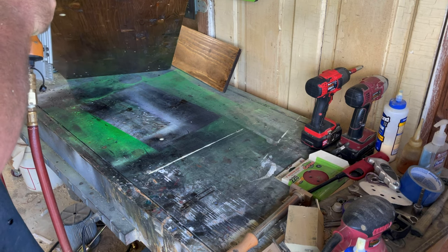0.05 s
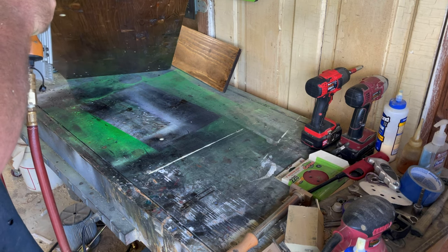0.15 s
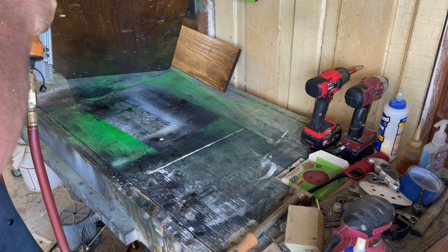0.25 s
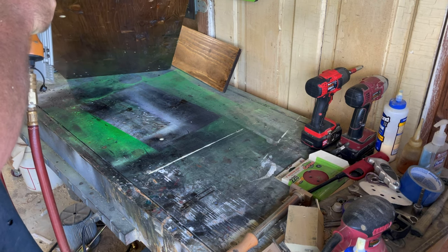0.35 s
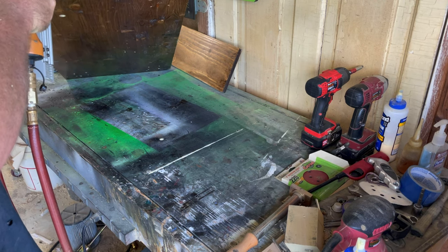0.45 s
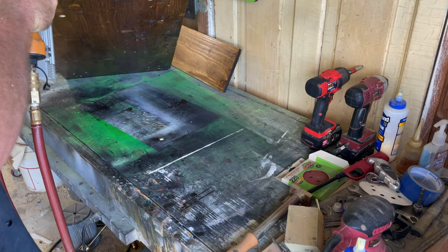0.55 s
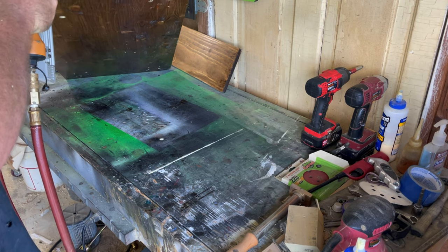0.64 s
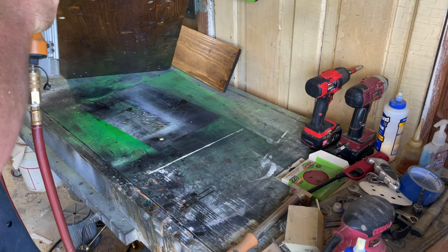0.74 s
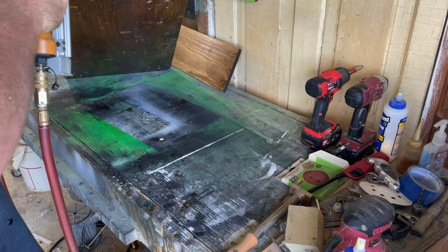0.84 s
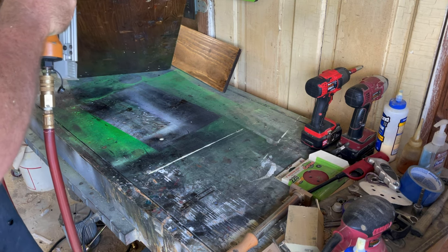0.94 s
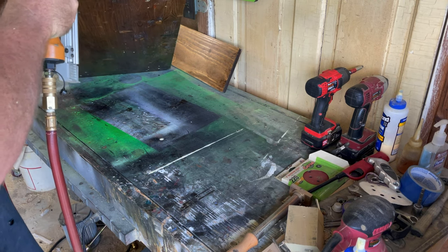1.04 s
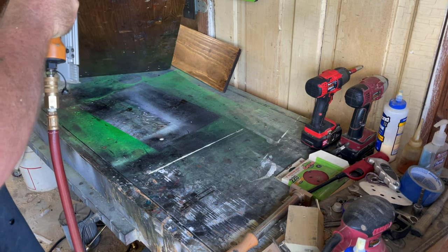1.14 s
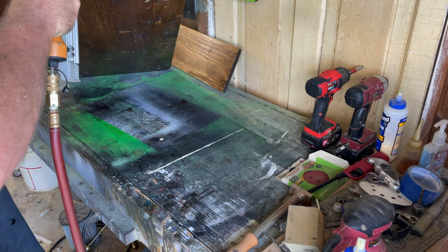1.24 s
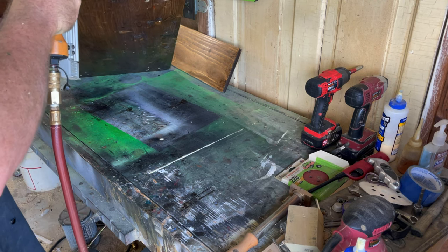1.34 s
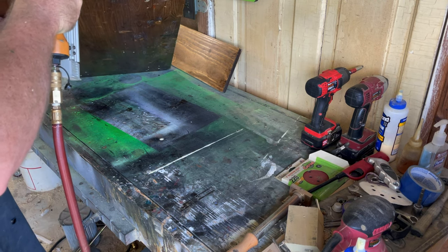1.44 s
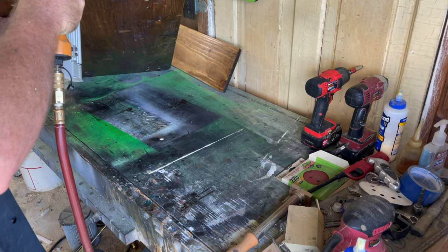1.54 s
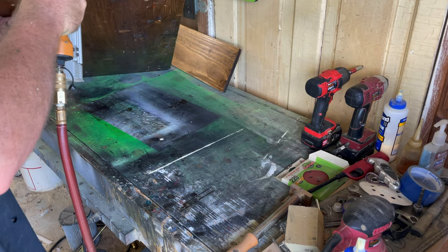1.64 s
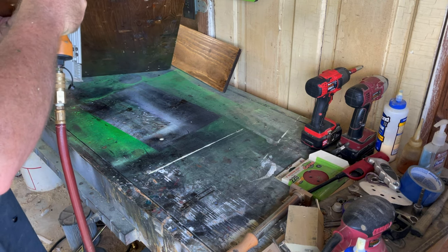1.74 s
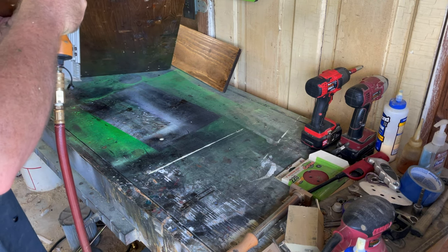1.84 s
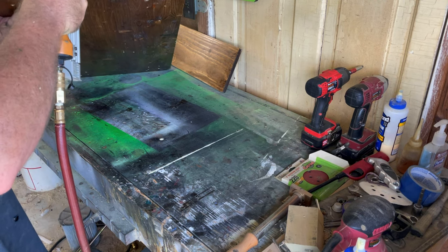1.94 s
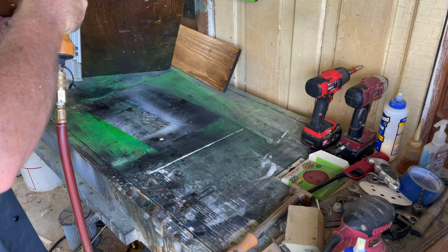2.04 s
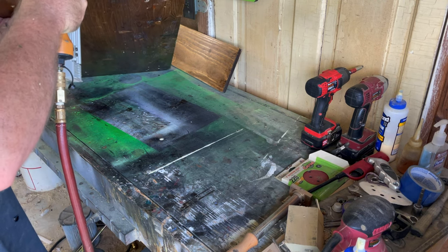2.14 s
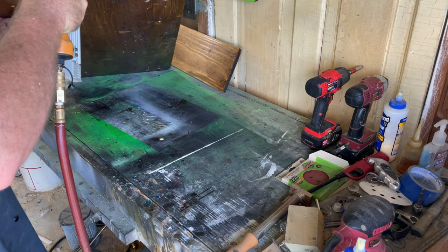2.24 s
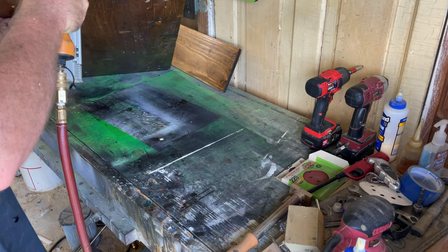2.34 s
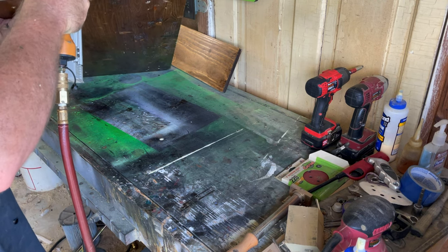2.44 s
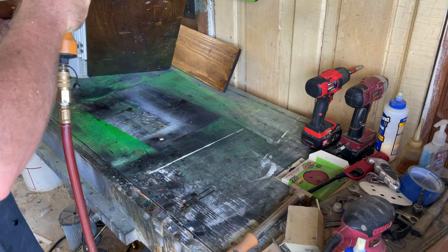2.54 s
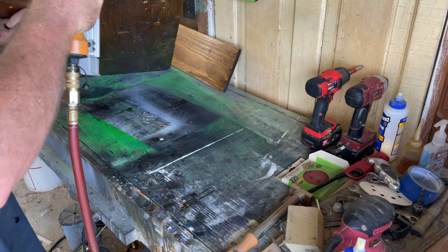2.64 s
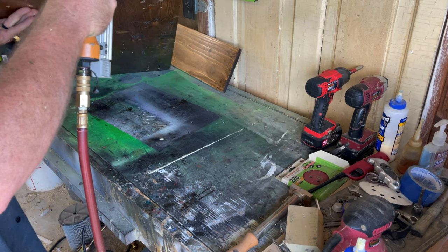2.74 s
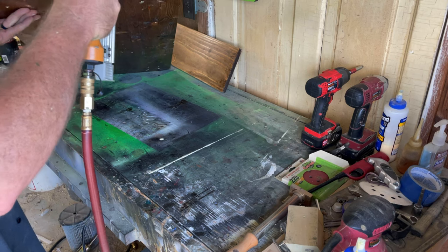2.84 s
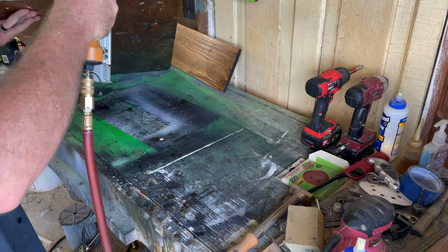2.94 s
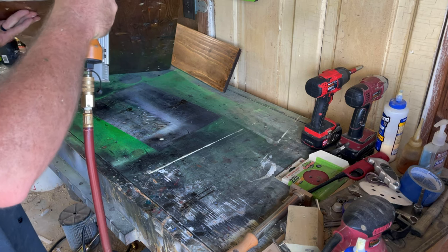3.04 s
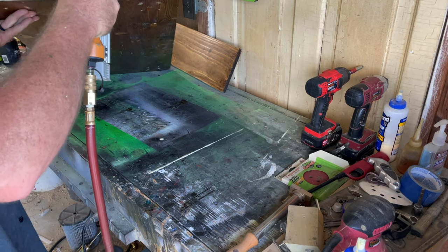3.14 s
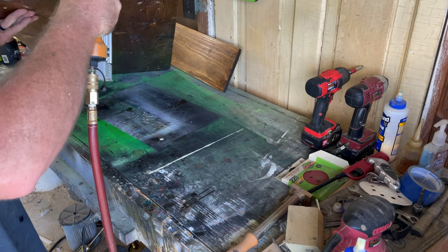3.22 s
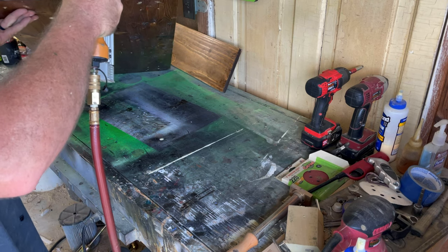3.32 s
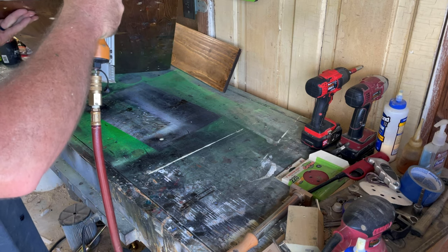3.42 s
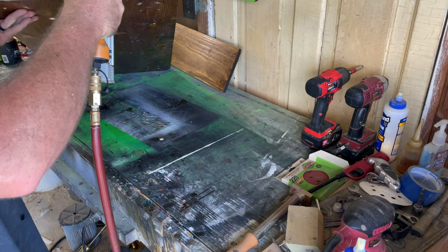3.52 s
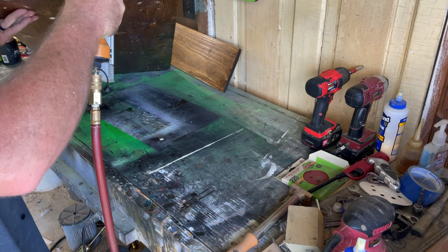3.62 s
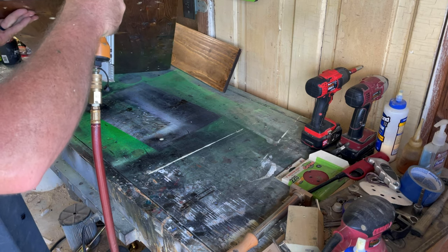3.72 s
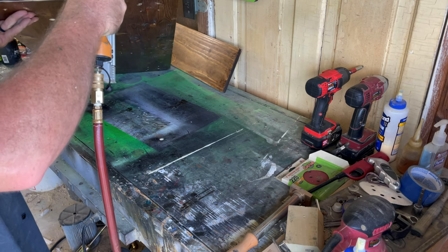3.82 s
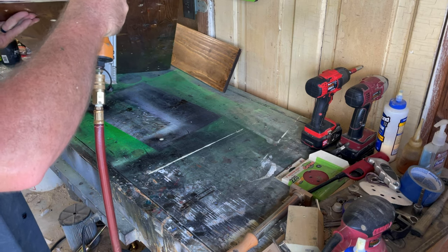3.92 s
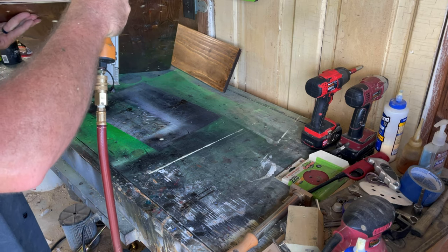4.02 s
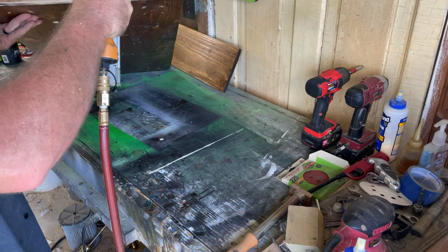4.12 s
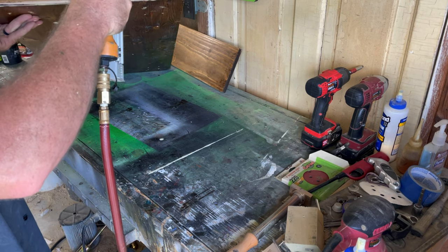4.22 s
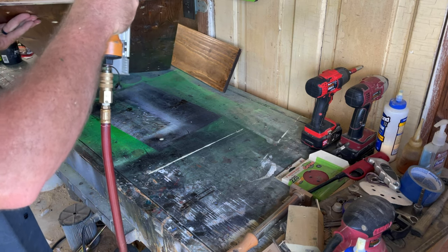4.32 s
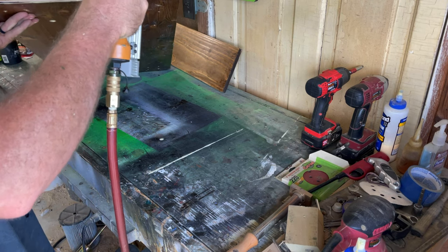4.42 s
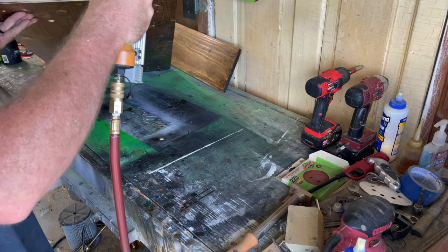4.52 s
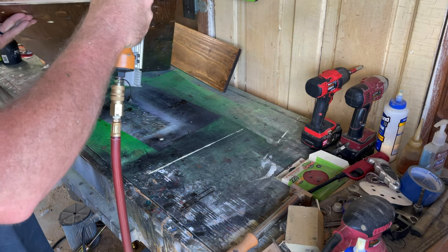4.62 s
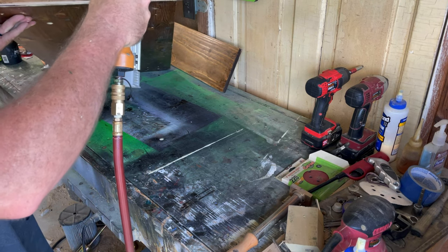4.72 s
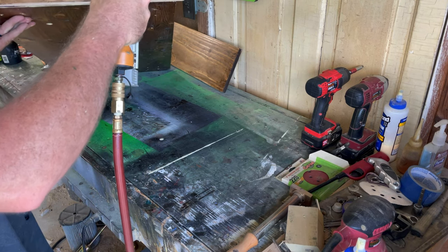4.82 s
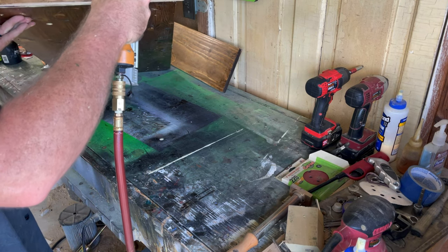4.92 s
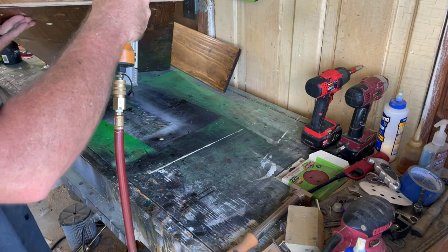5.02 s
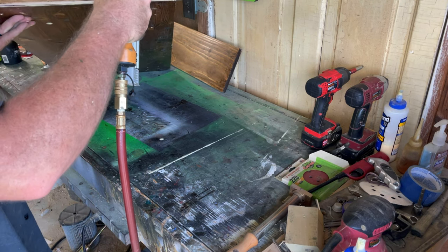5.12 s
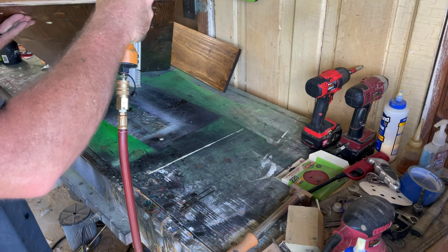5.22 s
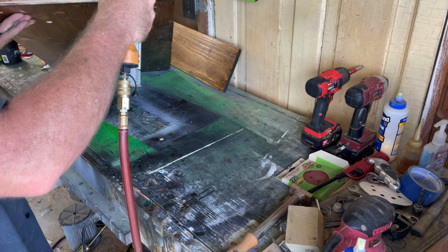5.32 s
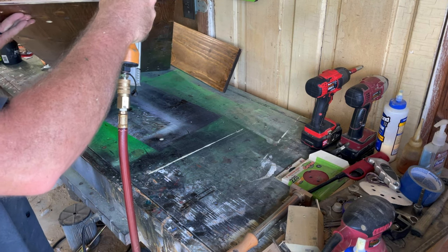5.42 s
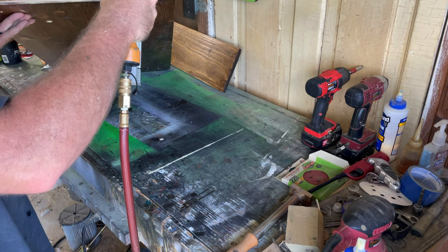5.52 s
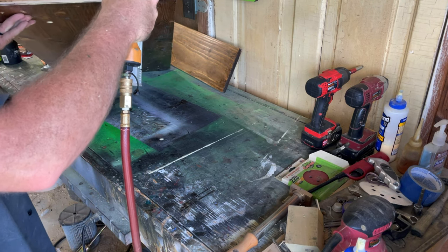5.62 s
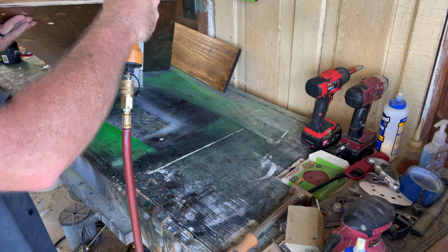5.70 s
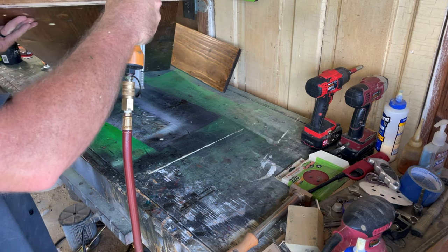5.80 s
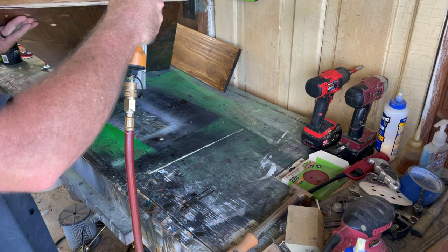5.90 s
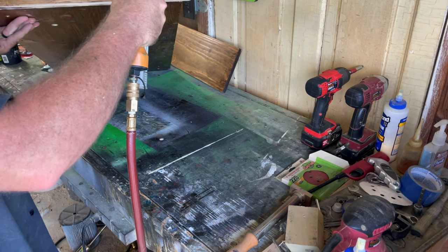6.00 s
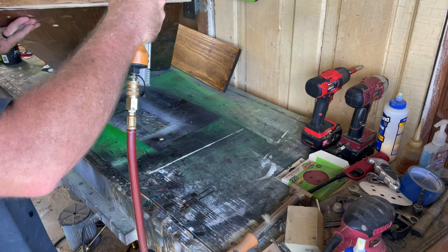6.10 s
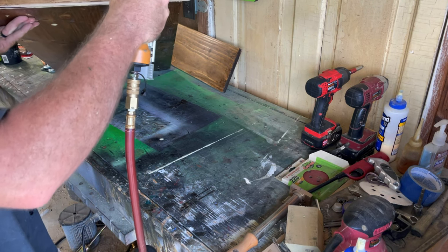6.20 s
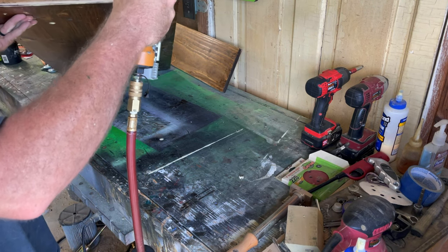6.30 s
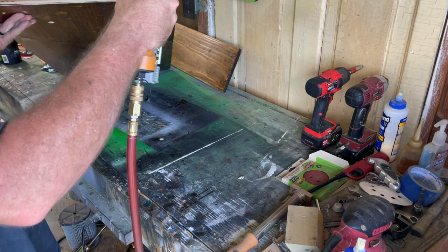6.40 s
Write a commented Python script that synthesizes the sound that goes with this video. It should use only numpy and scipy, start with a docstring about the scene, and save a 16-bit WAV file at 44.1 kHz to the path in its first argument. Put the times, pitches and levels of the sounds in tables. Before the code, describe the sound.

A quiet garage hush with a faint, wavering distant hum, slightly louder until the first shot. At 0.3 s the nailer's steel nose clacks on wood, with a faint bump at 0.4. At about 0.5 s a tiny trigger tick and short air hiss lead into a piercing crack with metallic, woody clatter; at 0.63 a bright blast of exhaust follows, with a low sinking flutter and the piston knocking home. The air seeps away within a fraction of a second. Light ticks come at 1.6, then a clack at 2.1, before the second shot at 2.35 and its exhaust at 2.45. Faint taps at 3.4 and 3.8 precede the third shot at 4.05, venting at 4.15. Small ticks at 5.3 and 5.65 and a slight slide at 5.85 lead to the last shot at 5.95, exhaust at 6.05, and a soft tap at 6.26. Close microphone, short reverberation.

```python
"""A pneumatic nailer fires four brads into a board in a small garage, over a quiet hush and a far-off hum.
Each shot is a trigger tick, a hiss of filtered noise, a push-pull pulse for the driver's blow and a noise clatter,
then a noise blast of exhaust with a sinking low swing, and the piston knocking home as ringing modes.
Between shots the steel nose ticks and clacks on the wood; the first bang drops an early boost for good."""
import sys
import numpy as np
from scipy import signal
from scipy.fft import rfft, irfft, next_fast_len
from scipy.io import wavfile
from scipy.ndimage import uniform_filter1d, map_coordinates

SR = 44100
rng = np.random.default_rng(int(sys.argv[2]) if len(sys.argv) > 2 else 0)


def wav_record(signal):
    """Record a signal, one row per channel, as 16-bit PCM in the file named by sys.argv[1]."""
    frames = np.transpose(np.atleast_2d(signal))
    bounded = np.clip(frames, -1, 1)
    # unit amplitude maps onto the largest positive 16-bit level
    quanta = np.round(bounded * 32767).astype(np.int16)
    wavfile.write(sys.argv[1], SR, quanta)


N = 284811
SPAN = SR // 2  # samples laid down for one event
LEAD_IN_S = .02  # an event's time zero lies this far into its span

# Event levels are those ahead of the boost and rounding in record().
# shots: (valve opens [s], trigger tick [dB], hiss [dB], stroke [dB], snap [dB], clatter [dB], bench rumble [dB])
SHOTS = [(.511, -61, -35.5, -27, -5, -10, -30.5), (2.338, -66, -37, -31, -6.5, -10.5, -36),
         (4.031, -68, -36, -27.5, -7, -11.5, -40), (5.927, -69, -37, -31, -4.5, -10.5, -37.5)]
# exhausts: (time [s], blast [dB], whistle [dB], swing [dB], swing starts at [Hz], swing lasts [s],
# buffet [dB], bench rumble [dB], piston rattles after [s], rattle [dB], piston home [dB])
EXHAUSTS = [(.633, -12, -15, -8, 170.7, .027, -15, -44, .014, -27.5, -26.5),
            (2.455, -9.5, -16, -18.5, 100, .045, -18, -46, .019, -25, -21.5),
            (4.146, -9, -21.5, -18, 149, .019, -26.5, -50.5, .0205, -21.5, -26.5),
            (6.042, -11.5, -11.5, -22, 231, .025, -18, -47, .02, -33.5, -26.5)]
# handling contacts: (time [s], tick [dB], knock [dB], thud [dB])
TOUCHES = [(.268, -65, -67.5, -73), (0.287, -67, -71.5, -75), (.301, -50.5, -44, -50.5),
           (.42, -80, -72, -60.5), (1.564, -66, -74.5, -90), (2.058, -71, -70.5, -80),
           (2.077, -70.5, -77.5, -82), (2.091, -59.5, -51, -56.5), (3.36, -69.5, -85, -75.5),
           (3.755, -74.5, -75, -83), (3.786, -59, -52.5, -56), (5.26, -72, -81, -80),
           (5.618, -72.5, -66, -83), (5.659, -55.5, -53, -54), (5.851, -71, -75.5, -71),
           (5.864, -68, -72.5, -70.5), (6.26, -63, -50, -71.5)]
# the far-off hum wavers: (time [s], low band [dB], upper band [dB])
HUM_LEVELS = [(0, -86, -74), (1, -81, -76.5), (2.4, -83, -80), (3.4, -73.5, -78.5), (4.3, -78.5, -80),
              (5, -76.5, -72), (5.7, -82.5, -78), (6.46, -75.5, -74.5)]

# envelopes: (wait [ms], rise [ms], hold [ms], change over the hold [dB], t60 [ms],
# slower tail against the quick fall [dB], tail t60 [ms])
VALVE_ENV = (-1.5, 4, 130, -13, 50, -40, 50)
SURGE_ENV = (5, 13, 2.5, -0.17, 90, -40, 100)
STROKE_ENV = (0.5, 19.5, 2, 0.2, 7.5, -60, 8.5)
CLATTER_ENV = (-3, 7, 3, -2, 41, -5, 75.5)
SHAKE_ENV = (0, 8, 2, 0.14, 120, -7.5, 600)
BLAST_ENV = (-4.5, 8.5, 1, -1.3, 35, -40, 35)
JET_ENV = (-1, 6, 34.5, -8, 70, -24.5, 150)
WHISTLE_ENV = (0, 2.5, 6.5, -0.78, 30, -12, 49.5)
DRAIN_ENV = (19.5, 25, 160, -17, 258, -40, 300)
GUST_ENV = (0, 8, 8, -0.2, 49.5, -40, 50)
LINGER_ENV = (20, 39.5, 149.5, -13.5, 500, -30, 700)
KNOCK_ENV = (0, 1, 2, -4, 22, -10, 45)
TICK_ENV = (0, 0.97, 5, -1, 50, -10, 100.5)
TAP_ENV = (0, 1, 7, -1.5, 60, -10.5, 90)
THUD_ENV = (8, 12.5, 2.5, 0.14, 120.5, -8, 600)
SLIDE_ENV = (1, 34.5, 19.5, -2.5, 28.5, -40, 30)

# noise colours, relative only: (frequency [Hz], density per Hz [dB])
# rushing air, seeping air, whistling exhaust port, low eddies of the jet
AIR = [(300, -42.5), (1000, -18.5), (3000, -7), (5000, -5), (7000, -3), (9000, 5), (12000, -4),
       (15500, -11.5)]
LEAK = [(500, -28.5), (1500, -10.5), (3000, -7.5), (4300, -6), (5100, 0), (6000, -5.5), (8500, -2.5),
        (12000, -3.5), (15500, -13.5)]
PORT = [(300, -25.5), (700, -7.5), (1200, -6), (1700, -4), (2500, -12.5), (4000, -15), (7000, -37.5)]
EDDIES = [(30, -10), (60, -2), (120, -4.5), (250, -7.5), (400, -10), (700, -33)]
# nailer body, cylinder cap, steel, wood, bench
BODY = [(60, -28), (200, -10.5), (400, 0.5), (850, -7), (1500, -7), (2200, -5.5), (3500, -9.5), (5000, -11),
        (8000, -12), (12000, -12.5), (15500, -23)]
CAP = [(300, -17), (700, -3), (1200, -1), (2000, -4), (3000, -11.5), (5000, -23.5), (9000, -44)]
STEEL = [(1000, -23.5), (2500, -7), (4000, 3.5), (6000, -3.5), (9000, -2.5), (12000, -8), (15500, -17)]
WOOD = [(200, -9.5), (500, -11), (1200, -4.5), (2100, 0.5), (3000, -8.5), (5000, -18.5), (9000, -36)]
BENCH = [(25, -20), (40, -1), (58, 3.5), (90, -6.5), (160, -15), (300, -26.5), (600, -59)]
# room hush, the two bands of hum, and flat noise for the reverberation
HUSH = [(25, -20), (65, -1.5), (112, -8.5), (160, -1.5), (270, -8), (600, -7.5), (1790, -8.5), (2600, -16),
        (4200, -25), (5200, -24.5), (6500, -29.5), (8640, -39.5), (11800, -32.5), (14500, -52)]
LOW_HUM = [(120, -40.5), (145, -2), (162, 1.5), (195, -40)]
UPPER_HUM = [(380, -39.5), (415, 0), (445, 2), (490, -41)]
FLAT = [(20, 0)]

# resonances of the nailer, its cylinder and its nose: (frequency [Hz], width [Hz], strength [dB])
NAILER_MODES = [(423, 360, -11), (816, 100, 1), (1320, 210, -2.5), (1520, 270, -0.5), (1980, 62, -4.5),
                (2150, 120, -1.5), (2720, 170, -6), (3570, 390, -3), (4800, 410, -7.5), (6400, 120, -12.5)]
CYLINDER_MODES = [(402, 70, -9), (794, 37, -1), (1085, 57, -1), (1500, 110, -5), (2120, 57, -8.5),
                  (2310, 69, -11), (2850, 140, -11.5)]
NOSE_MODES = [(1240, 190, -5.5), (1870, 70, -2.5), (2100, 17, -0.5), (2940, 90, -8), (3530, 90, -7.5),
              (4770, 120, -9), (5370, 110, -9.5)]

# near sound at the microphone pair, phase: (frequency [Hz], left leads right [rad])
LEFT_LEADS = [(200, 0), (700, .9), (1120, -.5), (2600, 1), (3450, 1.3), (5080, .4), (5700, -1), (6630, -.8),
              (7800, -2.6), (8600, -3.14), (10300, -4.3), (12500, -5.8), (15800, -6.7)]
# near sound, balance: (frequency [Hz], left minus right [dB])
LEFT_LOUDER = [(380, 0), (700, 4), (1290, 5), (2380, 5), (4400, 3.5), (8120, 0), (15000, 0)]
# likeness of left and right before phase and balance, near noise: (frequency [Hz], likeness [-1 to 1])
NEAR_LIKENESS = [(200, .96), (400, .88), (800, .55), (3000, .55), (6000, .8), (8000, .995), (15000, .95)]
# likeness of left and right, diffuse sound: (frequency [Hz], likeness, held within -1 to 1)
DIFFUSE_LIKENESS = [(60, 0.98), (150, 0.84), (380, 0.68), (950, -0.5), (2380, 0.021), (5980, 0.11),
                    (15000, -1.2)]
# reverberation of the garage: (frequency [Hz], t60 [s])
GARAGE_T60 = [(60, 0.13), (200, .25), (1000, 0.43), (3000, 0.45), (8000, 0.2), (15000, 0.12)]
# microphone response: (frequency [Hz], gain [dB])
CAPSULE = [(20, -31), (45, -4.5), (15700, 1.0), (16100, -25.5)]

TRIGGER_LEAD_S, STROKE_S = 0.041, .0217  # tick before the valve opens; valve to blow
SURGE_DB = 8.5  # the hiss swells as the driver flies, against the steady hiss
JET_DB, SEEP_DB = -6, -32.5  # streaming exhaust and last seeping air, against the blast
SWING_SINKS_TO_HZ = 56.3
HOME_S, HOME_RATTLE_DB = .0405, -0.5  # exhaust to piston home; its rattle against its ring
KNOCK_LAG_S = .0046  # the board answers the tick
SLIDE_S, SLIDE_DB = 5.84, -60.5  # the nose slides into place
HUSH_DB, HUSH_LEFT_DB = -65.5, 2.5  # mean level; left minus right


def amp(db):
    """Amplitude factor for a level in dB."""
    return 10 ** (np.asarray(db) / 20)


def along(points, hz):
    """Read (frequency, value) points along a log frequency axis."""
    f, v = np.transpose(points)
    return np.interp(np.log(hz + 1), np.log(f + 1), v)


def filtered(x, response):
    """Shape x by a complex response of frequency."""
    m = next_fast_len(x.shape[-1] + 4096)
    hz = np.fft.rfftfreq(m, 1 / SR)
    return irfft(rfft(x, m) * response(hz), m)[..., :x.shape[-1]]


def event_time():
    """Seconds from an event's time zero."""
    return np.arange(SPAN) / SR - LEAD_IN_S


def stereo_ports(hz):
    """Place a near sound by level and phase between the left and right microphone."""
    half = amp(along(LEFT_LOUDER, hz) / 2) * np.exp(.5j * along(LEFT_LEADS, hz))
    return np.array([half, 1 / half])


def peaks(modes, hz, between=.6):
    """Gain of a body that favours its resonances over the floor between them."""
    return between + sum(amp(db) / (1 + (2 * (hz - centre) / width) ** 2) for centre, width, db in modes)


def noise(colour, likeness, size, modes=()):
    """Stereo noise of rms 1, mixed from mid and side to the given left-right likeness."""
    def mid_side(hz):
        turn = np.arccos(np.clip(along(likeness, hz), -1, 1)) / 2
        gain = amp(along(colour, hz)) * peaks(modes, hz)
        return gain * [np.cos(turn), np.sin(turn)]

    mid, side = filtered(rng.standard_normal((2, size)), mid_side)
    pair = np.array([mid + side, mid - side])
    return pair / np.sqrt(np.mean(pair ** 2))


def burst(colour, envelope, modes=()):
    """Fluttering near noise that rises, holds and dies, quickly at first and then slowly."""
    wait_ms, rise_ms, hold_ms, change_db, t60_ms, tail_db, tail_t60_ms = envelope
    ms = event_time() * 1000 - wait_ms
    rise = np.clip(ms / rise_ms, 0, 1) ** 2
    hold = amp(change_db * np.clip((ms - rise_ms) / hold_ms, 0, 1))
    after = np.maximum(ms - rise_ms - hold_ms, 0)
    quick = amp(-60 * after / t60_ms)
    slow = amp(tail_db - 60 * after / tail_t60_ms)
    fall = (quick + slow) / (1 + amp(tail_db))
    # random level about every 3 ms
    flutter = map_coordinates(rng.standard_normal(160), [np.linspace(0, 158, SPAN)])
    near = filtered(noise(colour, NEAR_LIKENESS, SPAN, modes), stereo_ports)
    return rise * hold * fall * amp(2.6 * flutter) * near


def ring(modes):
    """A struck body: every mode starts at a new strength and dies as fast as it is wide."""
    t = np.maximum(event_time(), 0)
    wave = 0
    for hz, width, db in modes:
        strength = amp(db + rng.normal(0, 1.2))
        wave = wave + strength * np.exp(-np.pi * width * t) * np.sin(2 * np.pi * hz * t)
    return filtered(wave, stereo_ports)


def add(out, s, sound, room_db):
    """Lay a sound at time s with fresh noise reverberation that decays by frequency."""
    hz, t, z = signal.stft(noise(FLAT, DIFFUSE_LIKENESS, SPAN), SR, nperseg=256)
    decay = amp(-60 * t / along(GARAGE_T60, hz)[:, None])
    tail = signal.istft(z * decay, SR, nperseg=256)[1]
    tail = tail / np.linalg.norm(tail[0])
    wet = signal.fftconvolve(sound[:1], tail, axes=1)[:, :SPAN]
    start = round((s - LEAD_IN_S) * SR)
    out[:, start:start + SPAN] += sound + amp(room_db) * wet


def room_tone():
    """A steady noise hush that wavers a little, and two narrow noise bands of hum."""
    wavers_hz = 6
    steps = rng.standard_normal(int(N * wavers_hz / SR) + 4)
    waver_db = .8 * map_coordinates(steps, [np.arange(N) * wavers_hz / SR])

    s, low_db, upper_db = np.transpose(HUM_LEVELS)
    t = np.arange(N) / SR
    low = amp(np.interp(t, s, low_db)) * noise(LOW_HUM, DIFFUSE_LIKENESS, N)
    upper = amp(np.interp(t, s, upper_db)) * noise(UPPER_HUM, DIFFUSE_LIKENESS, N)

    sides = amp([[HUSH_LEFT_DB / 2], [-HUSH_LEFT_DB / 2]])
    hush = sides * amp(HUSH_DB + waver_db) * noise(HUSH, DIFFUSE_LIKENESS, N)
    return hush + low + upper


def handling():
    """The steel nose ticks and clacks, the board knocks and the bench thuds."""
    out = np.zeros((2, N + SPAN))
    for s, tick_db, knock_db, thud_db in TOUCHES:
        tick = amp(tick_db) * burst(STEEL, TICK_ENV)
        thud = amp(thud_db) * burst(BENCH, THUD_ENV)
        add(out, s, tick + thud, room_db=-10.0)
        clack = amp(-7.5) * ring(NOSE_MODES) + amp(-3.5) * burst(WOOD, TAP_ENV)
        add(out, s + KNOCK_LAG_S, amp(knock_db) * clack, room_db=-13)
    add(out, SLIDE_S, amp(SLIDE_DB) * burst(CAP, SLIDE_ENV), room_db=-4.5)
    return out[:, :N]


def snap(width_s, again_s, again_db):
    """The driver's blow: one push-pull of air, and once more off the bench."""
    def push_pull(u):
        return u * np.exp(.5 - u * u / 2)

    t = event_time()
    first = push_pull(t / width_s)
    again = amp(again_db) * push_pull((t - again_s) / width_s)
    return filtered(first + again, stereo_ports)


def swing(from_hz, to_hz, lasts_s):
    """The jet flaps past the microphone: a low swing that slows as the pressure drains, then fades."""
    t = np.maximum(event_time() - .006, 0)  # starts 6 ms late
    hz = to_hz + (from_hz - to_hz) * np.exp(-t / 0.012)
    turns = np.cumsum(hz * (t > 0)) / SR
    level = np.exp(-(t / lasts_s) ** 2) * (1 - np.exp(-t / 0.0025))
    wave = np.sin(2 * np.pi * turns) * level
    return np.array([wave, wave])


def fire(out, shot, exhaust_s):
    """Trigger tick, air hissing through the valve, the driver's stroke, and its blow shaking the bench."""
    s, trigger_db, hiss_db, stroke_db, snap_db, clatter_db, rumble_db = shot
    add(out, s - TRIGGER_LEAD_S, amp(trigger_db) * burst(STEEL, TICK_ENV), room_db=-8.5)

    held = event_time() < exhaust_s - s  # the steady hiss stops when the exhaust opens
    hiss = held * burst(AIR, VALVE_ENV) + amp(SURGE_DB) * burst(AIR, SURGE_ENV)
    stroke = amp(stroke_db) * burst(CAP, STROKE_ENV)
    add(out, s, amp(hiss_db) * hiss + stroke, room_db=-13.5)

    blow = amp(snap_db) * snap(width_s=0.00012, again_s=.0033, again_db=-0.5)
    clatter = amp(clatter_db) * burst(BODY, CLATTER_ENV, NAILER_MODES)
    add(out, s + STROKE_S, blow + clatter, room_db=-12.5)
    add(out, s + STROKE_S, amp(rumble_db) * burst(BENCH, SHAKE_ENV), room_db=-19)


def exhaust(out, s, blast_db, whistle_db, swing_db, from_hz, lasts_s, buffet_db, rumble_db):
    """The released trigger vents the cylinder: blast, jet, port whistle, seeping air and low wind."""
    blast = burst(AIR, BLAST_ENV) + amp(JET_DB) * burst(AIR, JET_ENV)
    whistle = amp(whistle_db) * burst(PORT, WHISTLE_ENV)
    add(out, s, amp(blast_db) * blast + whistle, room_db=-27.0)
    add(out, s, amp(blast_db + SEEP_DB) * burst(LEAK, DRAIN_ENV), room_db=-13)

    flap = amp(swing_db) * swing(from_hz, SWING_SINKS_TO_HZ, lasts_s)
    buffet = amp(buffet_db) * burst(EDDIES, GUST_ENV)
    rumble = amp(rumble_db) * burst(BENCH, LINGER_ENV)
    add(out, s, flap + buffet + rumble, room_db=-29)


def piston_return(out, s, rattle_s, rattle_db, home_db):
    """The piston rattles on its way back, then knocks home and rings the cylinder."""
    add(out, s + rattle_s, amp(rattle_db) * burst(CAP, KNOCK_ENV), room_db=-15)
    home = amp(HOME_RATTLE_DB) * burst(CAP, KNOCK_ENV) + ring(CYLINDER_MODES)
    add(out, s + HOME_S, amp(home_db) * home, room_db=-15)


def nailer():
    """Every shot fires, vents its air and returns the piston."""
    out = np.zeros((2, N + SPAN))
    for shot, vent in zip(SHOTS, EXHAUSTS):
        fire(out, shot, exhaust_s=vent[0])
    for *air, rattle_s, rattle_db, home_db in EXHAUSTS:
        exhaust(out, *air)
        piston_return(out, air[0], rattle_s, rattle_db, home_db)
    return out[:, :N]


def scene():
    """The nailer, the handling and the room together."""
    return nailer() + handling() + room_tone()


def record(dry):
    """Gain control drops an extra boost at the first loud sound and keeps it off; peaks round off."""
    power = np.abs(uniform_filter1d(np.mean(dry ** 2, 0), size=88))  # over 2 ms
    loudest_db = 10 * np.log10(np.maximum.accumulate(power) + 1e-12)  # loudest so far
    boost_db = 11 * np.clip((-19.5 - loudest_db) / 7, 0, 1)
    x = filtered(dry, lambda hz: amp(along(CAPSULE, hz))) * amp(boost_db)
    x = x / (1 + np.abs(x / .9) ** 6) ** (1 / 6)  # soft ceiling at 0.9
    return filtered(x, lambda hz: hz < 16980)  # nothing above this frequency [Hz]


dry = scene()
out = record(dry)
wav_record(out)
```